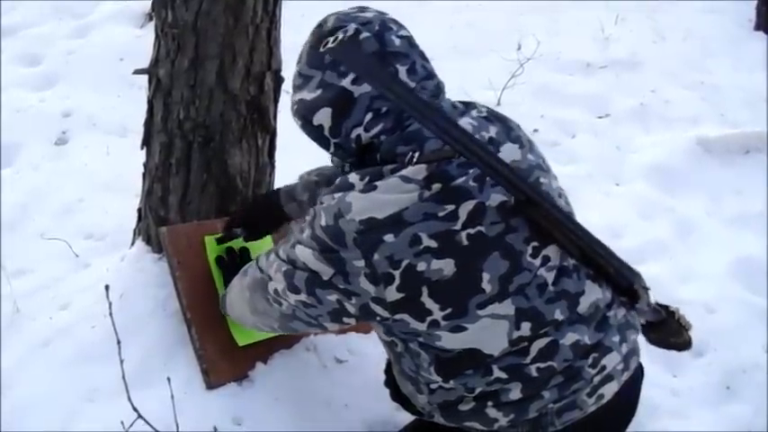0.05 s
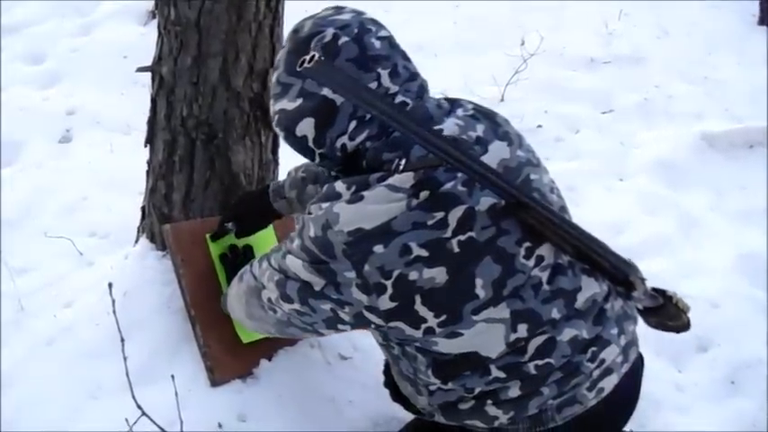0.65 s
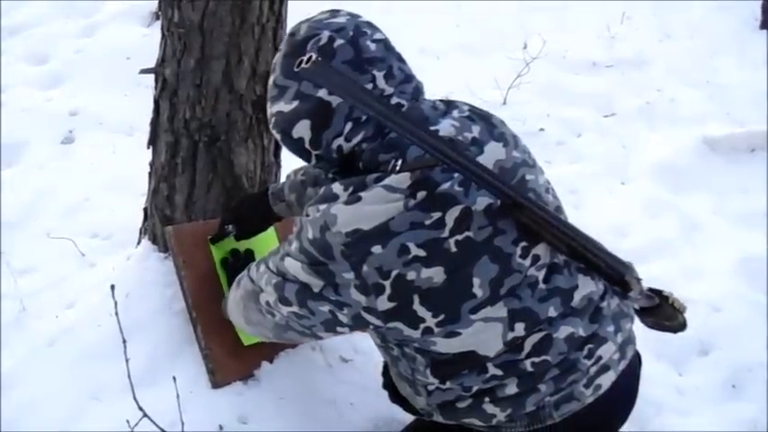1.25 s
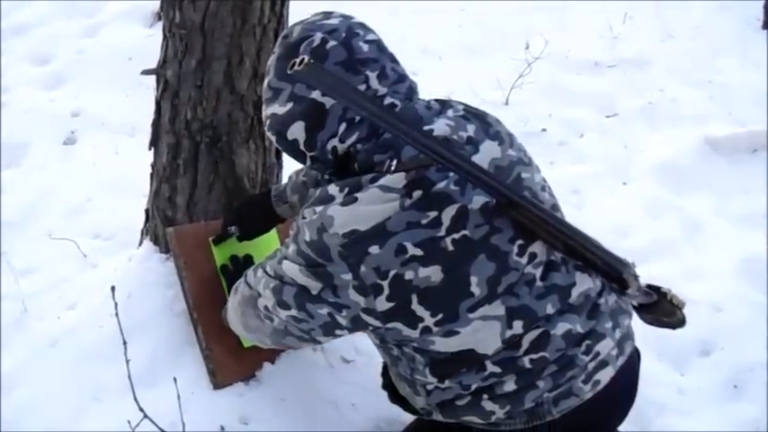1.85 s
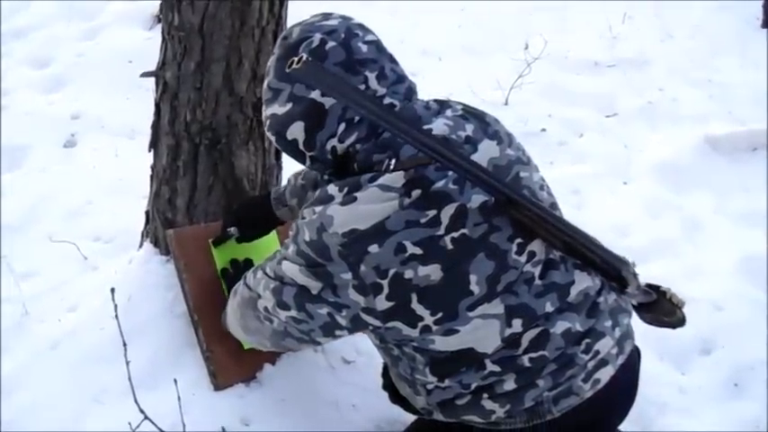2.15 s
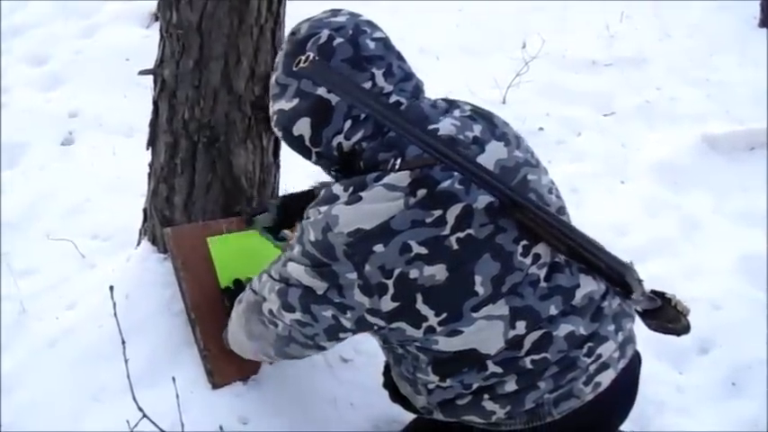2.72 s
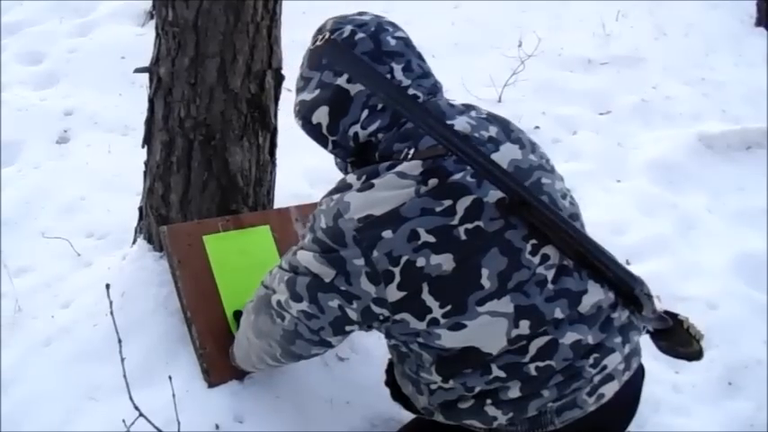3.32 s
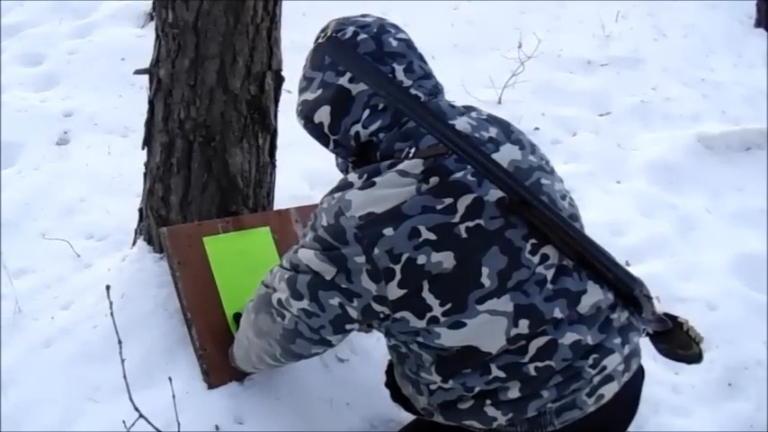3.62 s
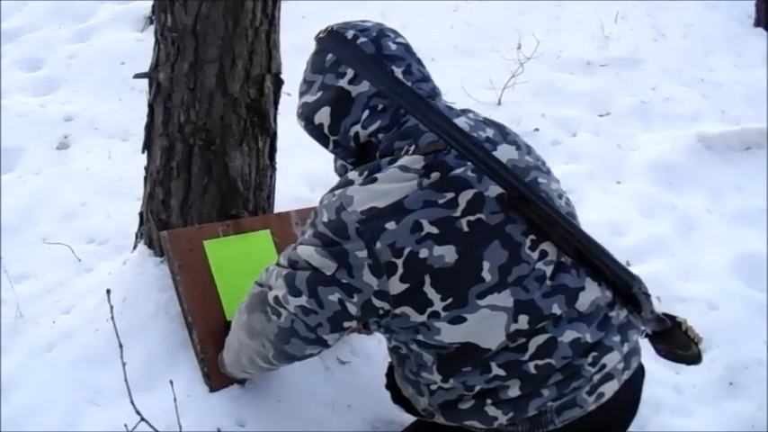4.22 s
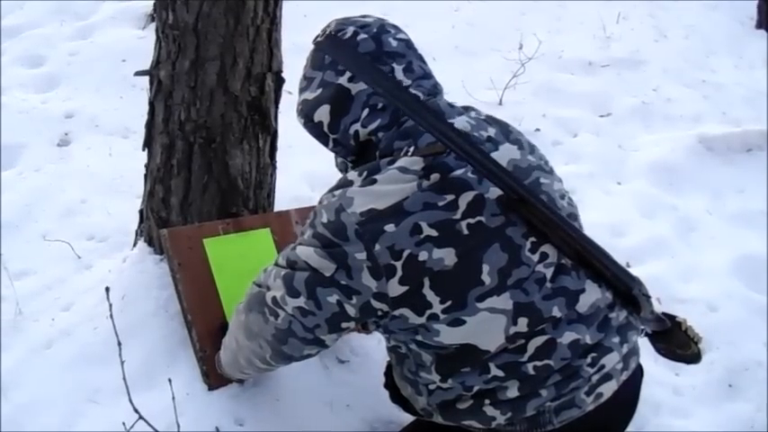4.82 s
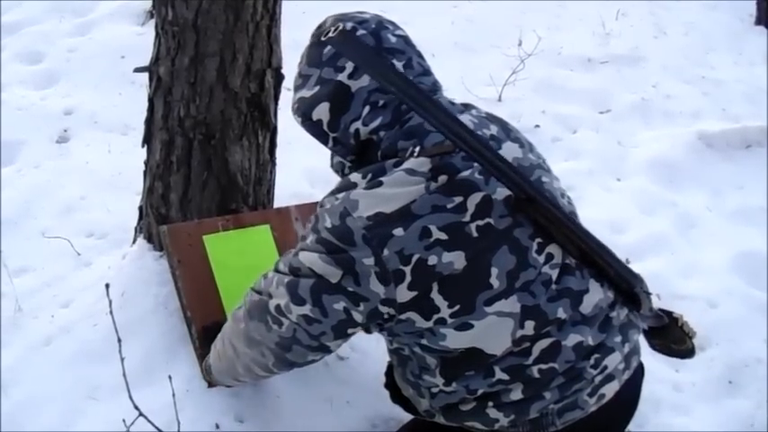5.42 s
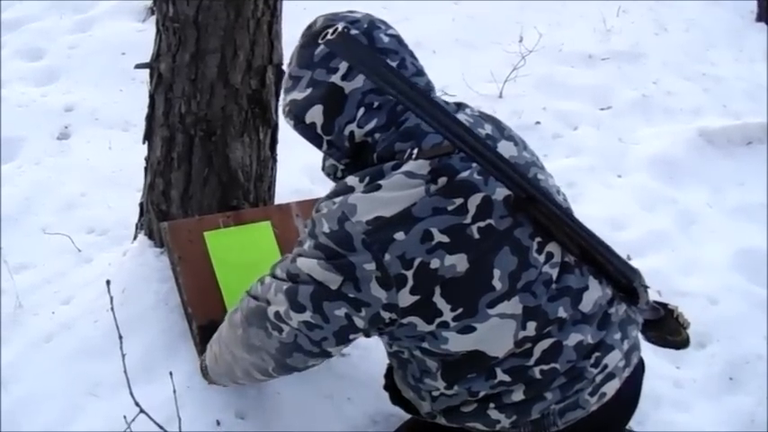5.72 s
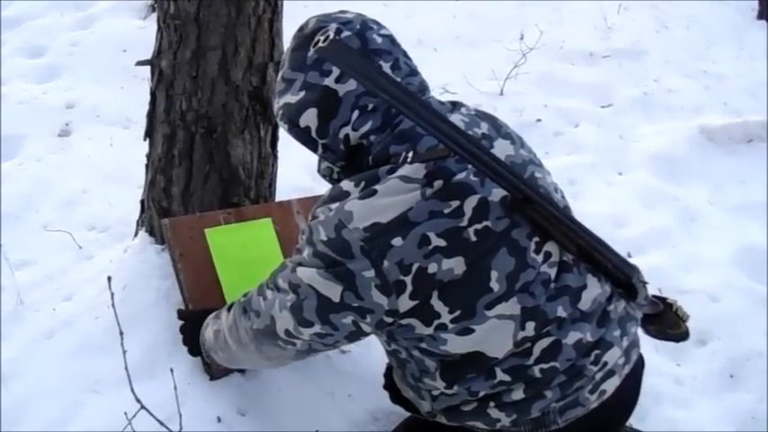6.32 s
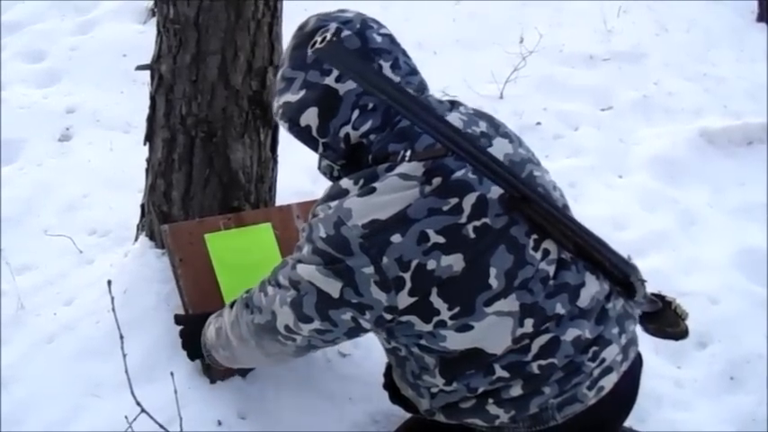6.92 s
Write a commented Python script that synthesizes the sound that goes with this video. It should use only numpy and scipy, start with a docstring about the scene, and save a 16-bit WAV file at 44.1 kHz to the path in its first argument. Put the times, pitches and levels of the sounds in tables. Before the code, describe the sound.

Close to the microphone, a hand stapler knocks lightly against a wooden board, then drives in three staples at an unhurried pace. Every hard steel snap makes the board thud and rattle briefly, and nearby trees scatter a short echo. Small lever clicks, dull wooden bumps and a few soft hisses fill the pauses. The winter wood around is very still, with two barely audible bird whistles far away.

```python
"""Stapling paper in a snowy wood

Close to one microphone, a spring-loaded hand stapler fixes a sheet to a board leaning on a tree.
Three times the latch trips, the striker slams, steel and board ring, and the trunks scatter the crack.
In between, the tool knocks on the board, its lever creaks and clicks home, and soft hisses come and go.
Faint birds whistle far off in the still air. Gain control ducks after each staple and creeps back up."""
import sys
import numpy as np
from scipy import signal
from scipy.fft import rfft, irfft
from scipy.io import wavfile

SR = 44100
rng = np.random.default_rng(int(sys.argv[2]) if len(sys.argv) > 2 else 0)


def generate_wav(sig):
    """Save sig (samples, or channels by samples) to the path in sys.argv[1] as 16-bit PCM at SR."""
    pcm = np.round(np.clip(np.atleast_2d(sig).T, -1, 1) * 32767).astype(np.int16)
    wavfile.write(sys.argv[1], SR, pcm)


N = 306926
T = np.arange(SR * 3 // 4) / SR  # seconds within one event

# Staples driven close to the microphone. Each row: start in seconds, crack level in dB, its treble
# shelf in dB, chatter length in seconds, then thump, steel ring and echo levels in dB.
STAPLES = [(2.3611, -10, 6, 0.0082, -22.5, -23, -6.5), (4.2650, -5.5, -1.5, 0.0009, -11, -40, -8),
           (6.6520, -10, -5, 0.008, -17, -50, -6)]
# The board under the stapler's nose. Each row: mode in Hz, decay (t60) in seconds, then its level in dB
# at the first, second and third staple.
BOARD_MODES = [(305, .035, -17, -16, -9.5), (420, 0.088, -28.5, -47.5, -45), (533, 0.12, -38, -25, -33),
               (640, 0.042, -29, -12, -37), (768, 0.039, -20, -6.5, -35), (845, .1, -21.5, -28, -20.5),
               (1281.5, 0.076, -10.5, -33, -16), (1447, 0.068, -24, -20.5, -19.5),
               (1550, 0.071, -20.5, -21, -17), (2067, 0.081, -23.5, -23.5, -24),
               (2145, 0.027, -23, -8, -16), (3250, 0.061, -29, -21.5, -22.5),
               (4180, .05, -31.5, -43, -17.5)]
# The stapler's steel. Each row: mode in Hz, level in dB, decay (t60) in seconds.
STEEL_MODES = [(2950, -11, .2), (3440, -11, .14), (4120, -5, .14), (4790, 15, .04), (6090, 21, .03),
               (6170, -16, .35), (7380, 11, .045), (8200, -6, .13), (8760, 20, .032), (9640, -6, .12),
               (10700, -10, .25), (11000, -10, .25), (11550, -6, .14), (11900, -9, .2), (12300, -6, .11),
               (13350, 11, .045)]
# The striker's crack from close by. Each row: frequency in Hz, relative level in dB.
CRACK_SPECTRUM = [(30, -20.5), (120, -6), (250, 0), (600, 2), (850, 4.5), (1100, -1), (2100, 2.5),
                  (2800, 0), (5000, 0), (6200, -5.5), (7200, -0.5), (10500, 0.5), (14000, -4)]


def staple(spot, crack_db, treble_db, chatter_s, thump_db, steel_db, echo_db):
    """The striker slams and chatters while the staple sinks in; board and steel ring on."""
    drive = np.minimum(T / 0.0016, 1) ** 2 * np.exp(-np.maximum(T - chatter_s, 0) / 0.0022)
    chatter = 1 + .5 * np.cos(2 * np.pi * (T - .002) / .0028)
    crack = undb(crack_db) * colour(grains(0.93) * drive * chatter, CRACK_SPECTRUM)
    # the nose presses the board in, with one hard spike as the staple seats
    press = late(board_push(360, bounce_s=.0029, bounce_db=-3.5), 0.00088)
    spike = late(board_push(790, bounce_s=0.001, bounce_db=-6.5), 0.0013)
    thump = undb(thump_db) * (press + undb(-4) * spike)
    # each staple lands on another spot, which favours other modes of the board
    board = ring([(hz, dbs[spot], t60) for hz, t60, *dbs in BOARD_MODES], rise_s=.002, rough=0.15)
    steel = undb(steel_db) * ring(STEEL_MODES, rise_s=0.00096, rough=.7)
    # the crouching body shades only the direct treble; the trees hear all of it
    direct = shelf(crack, treble_db, hz=3343) + thump + late(board + steel, 0.00079)
    # the board is too small to radiate deep bass
    direct = signal.sosfilt(signal.butter(2, 140, "high", fs=SR, output="sos"), direct)
    return direct + undb(echo_db) * trunk_echo(near_db=-14, far_db=-28)


def board_push(hz, bounce_s=0.00305, bounce_db=-9):
    """The board gives way and springs back, one swing of pressure; the trunk behind repeats it."""
    phase = 2 * np.pi * hz * T - np.pi
    swing = -phase * np.exp((1 - phase ** 2) / 2)
    return swing + undb(bounce_db) * late(swing, bounce_s)


# The tool bumps the board, close by. Each row: start in seconds, level in dB, contact pitch in Hz,
# relative level of the hard tick in dB.
KNOCKS = [(0.3615, -34.5, 315, -7.5), (0.937, -22, 860, -19.5), (1.08, -54.5, 222, -42),
          (2.37, -14, 950, -28), (2.4817, -28, 830, -30), (2.537, -43.5, 394, -5),
          (3.5106, -29, 400, -27.5), (3.9690, -32.5, 560, -16.5), (4.2438, -34.5, 600, -27.5),
          (4.4180, -13, 654, -35), (4.731, -42.5, 460, -24.5), (5.8141, -27, 400, -25.5),
          (6.112, -46.5, 387.5, -30.5), (6.6660, -17, 840, -24), (6.758, -28, 323, -15),
          (6.8042, -13.5, 700, -26), (6.903, -36, 360, -31.5)]
# The board's woody rattle. Each row: frequency in Hz, relative level in dB.
RATTLE_SPECTRUM = [(40, -36.5), (130, -11), (220, -1.5), (300, 5.5), (400, 0), (520, 3), (720, 0),
                   (1300, -11), (2150, -7.5), (2700, -24.5), (6000, -18.5), (14000, -27)]


def knock(db, hz, tick_db):
    """A blunt contact, then the board's dense, damped modes; a softer contact is duller and hollower."""
    hardness = np.log2(hz / 620)  # octaves above a middling contact
    rattle = colour(grains(1) * (fade(0.038) + undb(-4) * fade(0.095)), RATTLE_SPECTRUM)
    rattle = lowpass(rattle, 1.5 * hz, order=1) * (1 - np.exp(-T / .0016))
    hollow = ring([(200, 4.5, .09), (267, -3, 0.1)], rise_s=0.0068)
    wood = undb(-7 - 4.5 * hardness) * rattle + undb(-17 - 15 * hardness) * hollow
    tick = lowpass(colour(grains(1.5) * fade(.045), SNAP_SPECTRUM), 6000, order=1)
    return undb(db) * (board_push(hz) + wood + undb(tick_db) * tick)


# The loose board sways against the tree after a staple. Each row: start in seconds, pitch in Hz,
# level in dB, rise as a share of the pitch.
BOARD_SWAYS = [(2.366, 306.4, -25.5, 0.062), (4.271, 155, -22, 0.2), (4.273, 216, -23, 0.049),
               (4.284, 343, -14, 0.3), (6.659, 364, -24.5, 0.049)]


def twang(hz, db, rise, swell_s=0.0099, t60=.11):
    """One mode swells and dies, rising in pitch as the part settles against its support."""
    pitch = hz * (1 + rise * (1 - np.exp(-T / .014)))
    return undb(db) * np.sin(2 * np.pi * np.cumsum(pitch) / SR) * fade(t60) * np.minimum(T / swell_s, 1)


# The lever clicks home in the hand. Each row: start in seconds, level in dB, shelf above 4 kHz in dB,
# relative level of the housing in dB.
LEVER_CLICKS = [(2.568, -40.5, 1, -26.5), (2.7574, -32, 9.5, -21), (2.7838, -27, -2, -23),
                (5.0085, -36, -2.5, -0.5), (5.1940, -32.5, -6.5, -1), (5.3393, -44, -2.5, -29)]
# Steel snapping on steel, from close by. Each row: frequency in Hz, relative level in dB.
SNAP_SPECTRUM = [(100, -24.5), (900, -23.5), (1400, 0.5), (2200, 1), (2800, 2.5), (3500, -0.5), (4500, -2),
                 (5800, -6), (7200, -6), (14000, -7)]
# The stapler's housing. Each row: mode in Hz, level in dB, decay (t60) in seconds.
HOUSING_MODES = [(1421, -3, 0.052), (1500, -3, 0.042), (2000, -5, 0.023)]


def click(db, treble_db, housing_db):
    """Small steel parts snap together and knock the housing."""
    snap = colour(grains(3.6) * fade(.034) * (1 - np.exp(-T / 0.00047)), SNAP_SPECTRUM)
    housing = undb(housing_db) * ring(HOUSING_MODES, rise_s=0.0014)
    return undb(db) * (shelf(snap, treble_db) + housing)


# The latch trips inside the tool just before each staple. Each row: start in seconds, level in dB.
LATCHES = [(2.3457, -23.5), (4.2434, -28.5), (6.6357, -30)]


def latch(db):
    """The catch lets go of the striker."""
    return click(db, treble_db=-2, housing_db=-25.5)


def spring_ping():
    """The spring pings once under tension."""
    return twang(hz=2240, db=-27.5, rise=.09, swell_s=0.00125, t60=0.02)


# The lever creaks under the hand. Each row: start in seconds, first gap in seconds, level in dB.
CREAKS = [(3.0106, .081, -46), (6.3748, .069, -46.5)]


def creak(gap_s, db, count=4):
    """The lever sticks and slips in dull ticks, each slip sooner than the last."""
    gaps = gap_s * .93 ** np.arange(count)
    return sum(late(click(db, treble_db=-18, housing_db=-8.5), s) for s in np.cumsum(gaps) - gaps)


# Brief soft hisses, two of them swelling just before a staple. Each row: start in seconds,
# length in seconds, level in dB, treble corner in Hz.
SOFT_HISSES = [(1.606, 0.079, -48, 9000), (2.285, 0.1, -47, 12000), (3.979, 0.072, -46, 2680),
               (4.473, 0.2, -57, 8000), (6.564, 0.11, -47, 9400), (6.881, 0.06, -43, 590)]
# The colour of those hisses. Each row: frequency in Hz, relative level in dB.
SOFT_HISS_SPECTRUM = [(60, -8), (250, 1.5), (800, -3.5), (2000, -6), (4500, -14.5), (14000, -10.5)]


def soft_hiss(length_s, db, corner_hz):
    """A short breath of fine-grained noise swells and stops."""
    swell = np.sin(np.pi * np.minimum(T / length_s, 1))
    return undb(db) * swell * unit(lowpass(colour(grains(0.99), SOFT_HISS_SPECTRUM), corner_hz))


# What the surrounding trunks send back to the microphone. Each row: frequency in Hz, relative level in dB.
ECHO_SPECTRUM = [(100, -10), (400, -6), (1300, 0), (2800, -2), (4200, -2.5), (6000, -4), (8500, -0.5),
                 (10000, 2.5), (11000, 4), (11800, -0.5), (14000, -0.5)]


def trunk_echo(near_db=-21, far_db=-28.5):
    """Near trunks answer at once; far ones scatter a thin, bright tail over the snow."""
    near = grains(1) * fade(0.097) * (1 - np.exp(-T / 0.012))
    far = grains(1, size=128) * fade(.72) * (1 - np.exp(-T / 0.03))
    return colour(undb(near_db) * near + undb(far_db) * far, ECHO_SPECTRUM)


# Birds far off in the wood. Each row: start in seconds, length in seconds, first and last pitch in Hz,
# level in dB.
BIRD_WHISTLES = [(3.471, 0.12, 4740, 3980, -69), (5.496, .15, 3570, 3760, -66.5)]


def bird_whistle(length_s, start_hz, end_hz, db):
    """A thin gliding note swells and fades."""
    progress = np.minimum(T / length_s, 1)
    pitch = start_hz + (end_hz - start_hz) * progress
    return undb(db) * np.sin(np.pi * progress) * np.sin(2 * np.pi * np.cumsum(pitch) / SR)


# The quiet of the wood all round the microphone. Each row: frequency in Hz, relative level in dB.
AIR_SPECTRUM = [(12, -31.5), (20, 0.5), (71, -2), (112, -2), (270, -3), (337, -3), (365, -3.5), (522, -6),
                (582, -6.5), (687, -7.5), (2860, -15), (3650, -16.5), (14000, -20)]


def winter_air():
    """Still air: a faintly stirring low rush under an even hiss."""
    steps = np.arange(0, 8, 1 / 16)
    stir = undb(0.46 * np.interp(np.arange(N) / SR, steps, rng.standard_normal(len(steps))))
    hiss = unit(colour(rng.standard_normal(N), AIR_SPECTRUM))
    return undb(-59) * (hiss + (stir - 1) * lowpass(hiss, 700, order=1))


def ring(modes, rise_s, rough=0., detune=0.0045):
    """Struck modes, shifted a little by each blow; with roughness, loose parts make them flutter."""
    steps = np.arange(0, T[-1], .005)
    tones = 0
    for hz, db, t60 in modes:
        wander, flutter, shift = rng.standard_normal((3, len(steps)))
        phase = 2 * np.pi * hz * (1 + detune * shift[0]) * T + rough * np.interp(T, steps, wander)
        envelope = undb(db) * fade(t60) * (1 + rough * np.interp(T, steps, flutter))
        tones = tones + envelope * np.sin(phase)
    return tones * (1 - np.exp(-T / rise_s)) / np.sqrt(1 + rough ** 2)


def grains(spread_db, size=16):
    """Noise made of tiny grains of uneven strength."""
    strength = np.repeat(undb(spread_db * rng.standard_normal(len(T) // size + 1)), size)
    return unit(strength[:len(T)] * rng.standard_normal(len(T)))


def colour(x, points, size=4096):
    """Causal filter through (Hz, dB) points that keeps the power of white noise."""
    hz, db = np.transpose(points)
    grid = np.maximum(np.fft.rfftfreq(size, 1 / SR), 1)
    gains = undb(np.interp(np.log(grid), np.log(hz), db))
    cepstrum = irfft(np.log(gains))
    cepstrum[1:size // 2] *= 2  # fold to minimum phase
    cepstrum[size // 2 + 1:] = 0
    response = irfft(np.exp(rfft(cepstrum)))
    return signal.fftconvolve(x, response / np.linalg.norm(response))[:len(x)]


def lowpass(x, hz, order=2):
    """Smooth treble roll-off."""
    return signal.sosfilt(signal.butter(order, min(hz, SR / 2 - 1), fs=SR, output="sos"), x)


def shelf(x, db, hz=4000):
    """Raise or lower the treble above a corner."""
    w, gain = 2 * SR * np.tan(np.pi * hz / SR), float(undb(db))
    b, a = signal.bilinear([gain, np.sqrt(2 * gain) * w, w * w], [1, np.sqrt(2) * w, w * w], SR)
    return signal.lfilter(b, a, x)


def undb(db):
    """Decibels to gain."""
    return 10 ** (np.asarray(db) / 20)


def unit(x):
    """Scale to rms 1."""
    return x / np.sqrt(np.mean(x ** 2))


def fade(t60):
    """Exponential decay, 60 dB down after t60 seconds."""
    return np.exp(-np.log(1000) * T / t60)


def late(x, delay_s):
    """The same sound a moment later."""
    return np.interp(T - delay_s, T, x, left=0)


def add(track, start_s, sound):
    """Mix a sound into the track at a time."""
    i = int(round(start_s * SR))
    track[i:i + len(sound)] += sound[:N - i]


def scene():
    """Three staples, the handling and the birds, heard from beside the board in the open wood."""
    small_sounds, staples = np.zeros(N), np.zeros(N)
    for source, table in [(knock, KNOCKS), (click, LEVER_CLICKS), (latch, LATCHES),
                          (soft_hiss, SOFT_HISSES), (creak, CREAKS), (twang, BOARD_SWAYS),
                          (bird_whistle, BIRD_WHISTLES)]:
        for start_s, *row in table:
            add(small_sounds, start_s, source(*row))
    add(small_sounds, 6.6062, spring_ping())
    for spot, (start_s, *row) in enumerate(STAPLES):
        add(staples, start_s, staple(spot, *row))
    echoes = undb(-24.5) * signal.fftconvolve(small_sounds, trunk_echo())[:N]
    return (staples + small_sounds + echoes + winter_air())[None]


def gain_control(x, threshold_db=-17, max_duck_db=4, start_duck_db=2, attack_s=0.15, recover_db_per_s=2):
    """Loud peaks turn the recorder's gain down; it climbs back at a steady rate."""
    over_db = np.clip(20 * np.log10(np.abs(x[0]) + 1e-9) - threshold_db, 0, max_duck_db)
    recovery_db = recover_db_per_s * np.arange(N) / SR
    held_db = np.maximum.accumulate(np.maximum(over_db + recovery_db, start_duck_db)) - recovery_db
    pole = np.exp(-1 / (attack_s * SR))
    duck_db = start_duck_db + signal.lfilter([1 - pole], [1, -pole], held_db - start_duck_db)
    return x * undb(-duck_db)


def record(dry):
    """The gain control rides the level, the microphone rounds the loudest peaks and the top is cut."""
    treble_cut = signal.ellip(12, .2, 80, 14200, fs=SR, output="sos")
    return signal.sosfilt(treble_cut, np.tanh(gain_control(dry)))


dry = scene()
out = record(dry)
generate_wav(out)
```